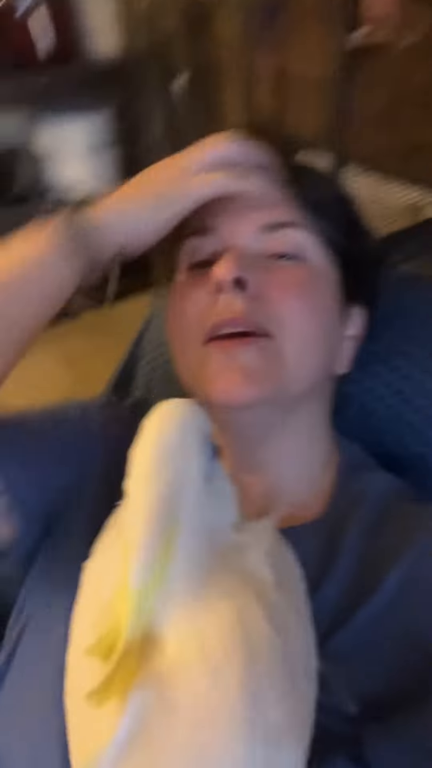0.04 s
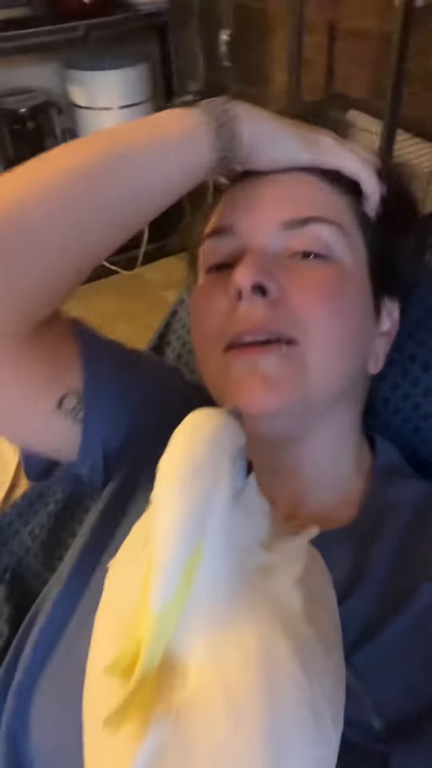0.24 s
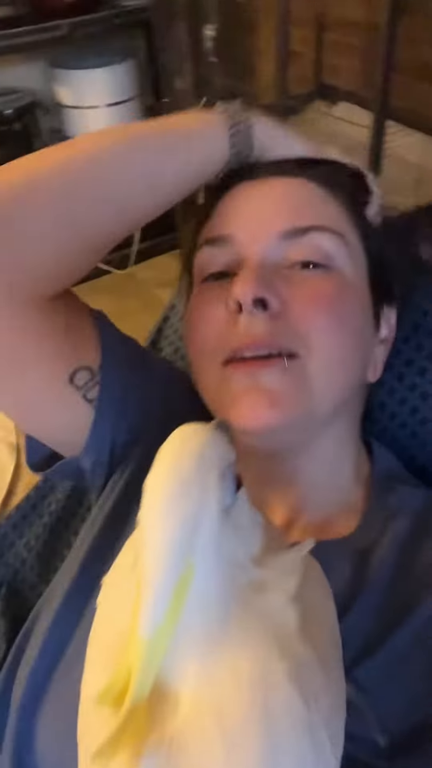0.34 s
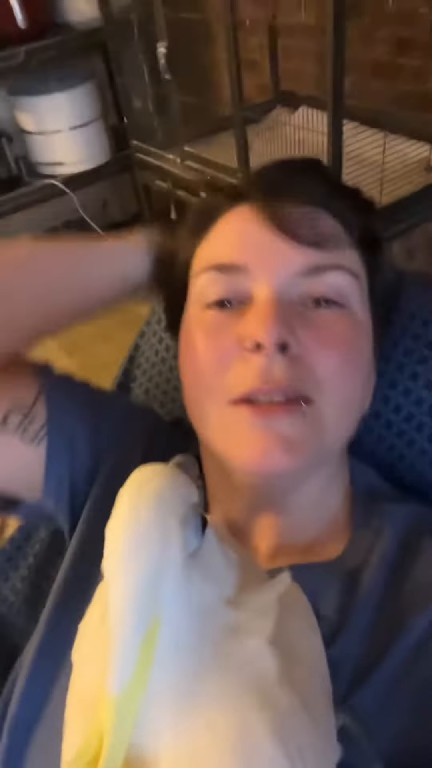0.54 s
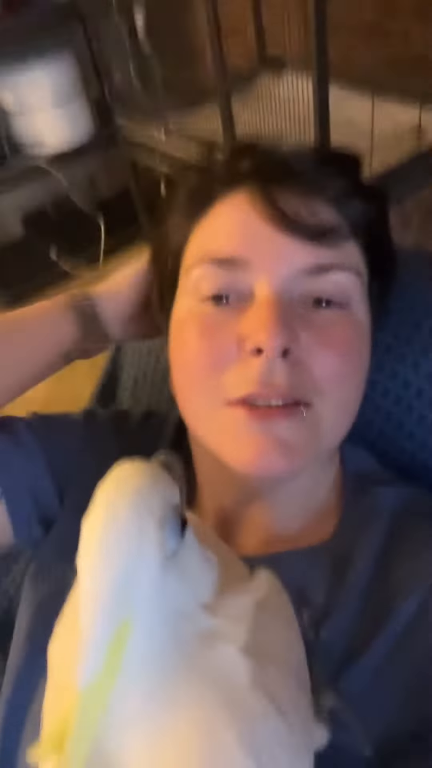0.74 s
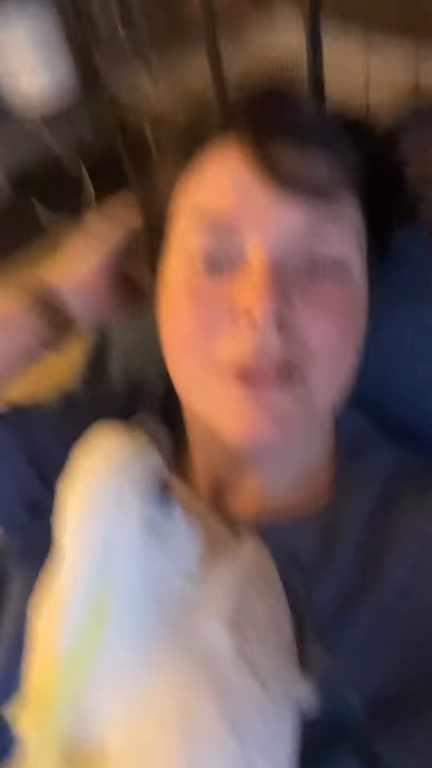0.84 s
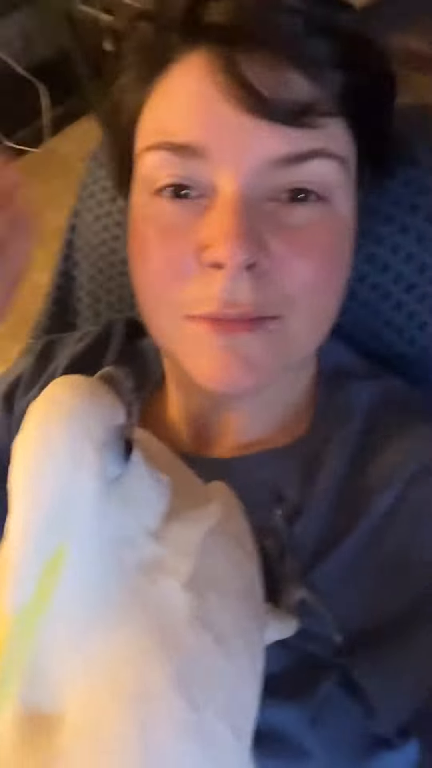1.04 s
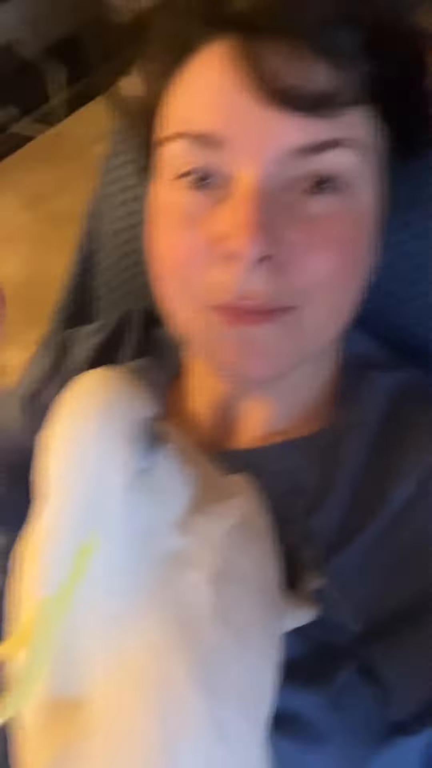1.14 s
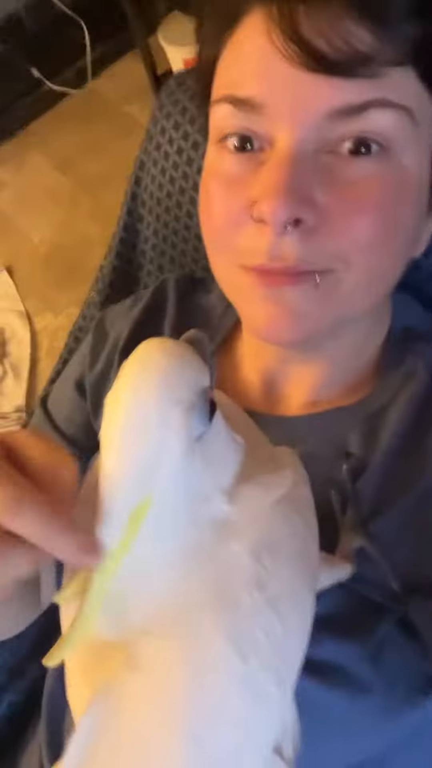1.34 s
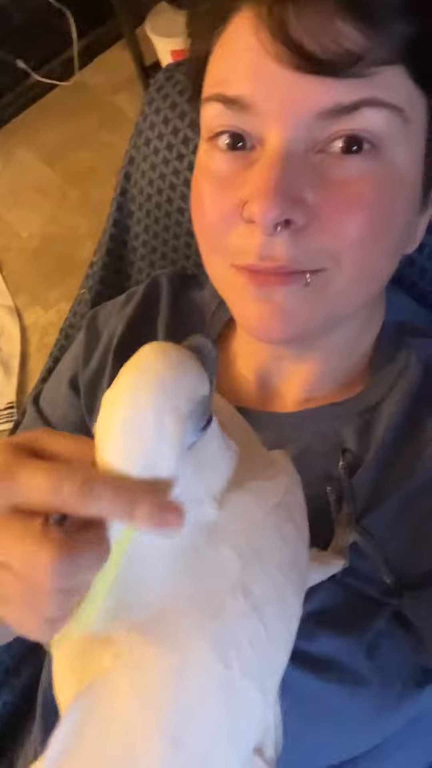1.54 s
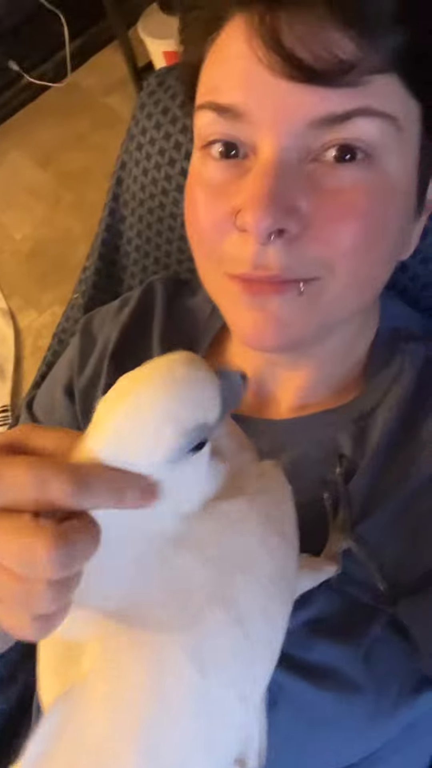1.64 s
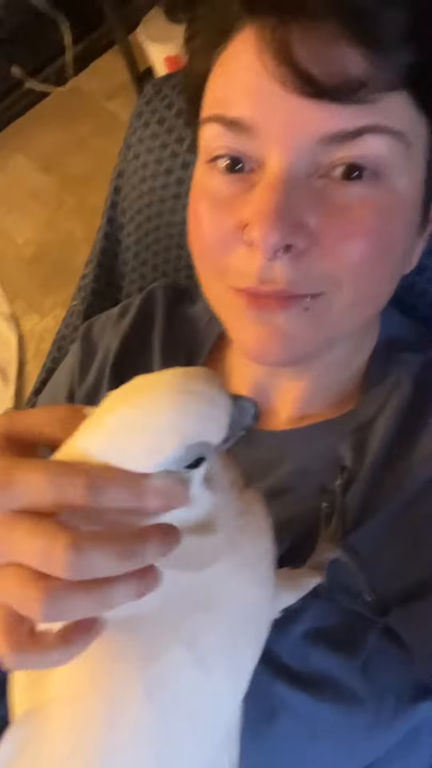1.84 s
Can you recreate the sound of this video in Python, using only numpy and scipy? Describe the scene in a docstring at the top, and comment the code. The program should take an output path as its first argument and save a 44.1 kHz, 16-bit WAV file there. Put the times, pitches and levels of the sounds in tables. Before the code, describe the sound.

A pet cockatoo calls close to the microphone in a lightly echoing living room. At 0.2 s comes a quick rising squeak, then from 0.33 s a louder hoarse, fluttering squeal climbs and thins into a faint whistle by 0.6 s. Soft peeps follow around 0.8-1.0 s, a shrill rattling rasp at 1.15 s, a dull bump with rebounds at 1.45 s, and faint gliding peeps until 1.9 s. A quiet fan hums and rushes throughout.

```python
"""In a living room, a pet cockatoo gives a rising squeak, a hoarse squeal that thins into a whistle, and a rasp.
Voiced calls are fluttering tones with overtones; the rasp is rattling noise under a shrill tone.
Soft peeps glide around the calls, and a dull bump with two rebounds rings low and scuffs.
The walls prolong all of these with fading noise; a fan adds wavering tones and a rush of air."""
import sys
import numpy as np
from scipy import signal
from scipy.fft import rfft, irfft
from scipy.io import wavfile

SR = 44100
rng = np.random.default_rng(int(sys.argv[2]) if len(sys.argv) > 2 else 0)


def wrap_up_sound(samples):
    """Save the sound to the file named by the first command line argument, as 16-bit audio."""
    columns = np.atleast_2d(samples).T
    # keep every value between -1 and 1, then stretch to whole-number steps
    tamed = np.clip(columns, -1, 1)
    steps = np.round(tamed * 32767).astype(np.int16)
    wavfile.write(sys.argv[1], SR, steps)


N = 83790  # length in samples

# All source levels below are before the room; those of voiced calls are also before the throat.
# Rising squeak: t/s, pitch f/Hz, level/dB
SQUEAK = [(.213, 1822, -51), (.226, 2027, -28.5), (.24, 2120, -26), (.258, 2220, -31), (.283, 2303, -41.5),
          (.305, 2317, -57), (.345, 2384, -36)]
# Hoarse squeal: t/s, pitch f/Hz, level/dB, roughness (0 = smooth, 1 = fully rough, slightly more allowed)
SQUEAL = [(.325, 1512, -33, 0.75), (.357, 1650, -30.5, 1.06), (.372, 1988, -24, 1.1),
          (.4, 2045, -22.5, 0.7), (.424, 2153, -24, 0.9), (.434, 2352, -24, 1.07),
          (.457, 2400, -28.5, 0.81), (.468, 2856, -27, 0.54), (.498, 2910, -45, 0.34),
          (.52, 2700, -35, 0.8)]
# Thin whistle: t/s, pitch f/Hz, level/dB
WHISTLE = [(.522, 3120, -36.5), (.533, 3347, -37.5), (.553, 3300, -45), (.573, 3460, -52), (.6, 3262, -53),
           (.645, 3150, -43.5), (.68, 3130, -69), (.715, 3250, -63), (.74, 3110, -71)]
# Overtones 2, 3, ... of each kind of voice: level/dB relative to the fundamental
SQUEAK_OVERTONES = [-4.5, -11.5, -18.5]
SQUEAL_OVERTONES = [-12, -28, -28.5]
THIN_OVERTONES = [-42]
# Colour that throat and beak give the voiced calls: f/Hz, level/dB
THROAT_COLOUR = [(1200, -25.5), (1800, -2.5), (2300, 0), (3450, 3), (3750, -5), (4200, 1.5), (5100, 4.5),
                 (5600, -10), (6200, -3.5), (7500, -4), (8600, -3), (10200, -9)]
# Rasping chirp: t/s, body level/dB, shrill top level/dB, centre of the top f/Hz
RASP = [(1.092, -60, -76, 5925), (1.118, -35.5, -71, 5940), (1.134, -43.5, -56, 6216),
        (1.148, -38, -32, 6200), (1.163, -32.5, -27.5, 6264), (1.18, -25.5, -28, 5756),
        (1.197, -32.5, -43, 5790), (1.214, -37, -60, 5500), (1.24, -60, -58, 5460), (1.26, -69, -72, 5600)]
# Throat resonances in the rasp: f/Hz, width f/Hz, relative level/dB
RASP_RESONANCES = [(2110, 670, -4.5), (2670, 610, -1.5), (3540, 920, -1), (4470, 1160, 0.5)]
# Soft peeps: start t/s, length t/s, first pitch f/Hz, last pitch f/Hz, level/dB
PEEPS = [(0.179, 0.025, 1808, 1950, -45.5), (0.774, 0.042, 2592, 2157, -50),
         (0.819, .016, 2870, 2810, -54.5), (0.892, 0.043, 2262, 2880, -47), (0.951, 0.071, 1514, 1560, -55),
         (1.414, 0.038, 3703, 2482, -50.5), (1.44, 0.0344, 2920, 2442, -46), (1.459, .03, 2322, 1948, -45),
         (1.55, 0.05, 2022, 2222, -49), (1.579, 0.0627, 2525, 2885, -52), (1.701, .025, 2166, 1960, -49),
         (1.734, 0.049, 1986, 2928, -52), (1.856, 0.045, 2020, 2416, -52)]
# Bump and its rebounds: t/s, level/dB
BUMPS = [(1.4453, -29), (1.455, -38), (1.483, -38.5)]
# Modes that ring after each contact: f/Hz, relative level/dB, time to fall 60 dB t/s
BUMP_MODES = [(137, -6.5, 0.064), (229, -4.5, 0.11), (269, -3, 0.052), (372, -3, 0.043),
              (444.3, -0.5, 0.074), (515, -1.5, 0.054), (626, -6, 0.031), (864, -0.5, 0.026)]
# Fan tones: f/Hz, level/dB
FAN_TONES = [(482, -55.5), (523, -66), (601, -65.5), (975, -66.5)]
# Colour of the steady air: f/Hz, relative level/dB
AIR_COLOUR = [(25, -31), (45, -16), (70, -4.5), (110, -8.5), (170, -9), (250, -7), (330, -7.5), (430, -2.5),
              (560, -5), (750, -10), (1000, -8.5), (1300, -11), (2200, -8.5), (3200, -18.5), (4500, -24.5),
              (7000, -30), (9800, -35.5), (11500, -44), (16000, -91)]
# Echo decay in the room: f/Hz, time to fall 60 dB t/s
ROOM_T60 = [(200, 0.37), (700, .33), (2200, .52), (3200, 0.48), (5000, 0.43), (9000, 0.39)]
# Stereo width of the echoes: f/Hz, side level/dB relative to the middle
ROOM_SIDE = [(200, -15), (600, -15), (1100, 0.5), (2000, -5), (3200, -1), (5000, -7), (9000, -0.5)]

SQUEAK_ROUGH, WHISTLE_ROUGH, PEEP_ROUGH = 0.38, 0.444, 0.72
# Flutter of a fully rough voice; depth is a fraction of the pitch
FLUTTER_HZ, FLUTTER_DEPTH, SHIMMER_DB = 247.2, 0.125, 1
EDGE_S = 0.0017  # fade at each end of a call
HISS_DB, HISS_HZ, HISS_WIDTH_HZ = -12.5, 5790, 1000
TOP_WIDTH_HZ, RATTLE_HZ, RATTLE_DB = 657, 302, 1.7
BEAK_HZ, BEAK_WIDTH_HZ, BEAK_DB = 7100, 2650, -5
SCUFF_DB, SCUFF_HZ, SCUFF_WIDTH_HZ, SCUFF_T60_S = -3, 1140, 2100, 0.035
BUMP_LOW_HZ = 85
TONE_WAVER_DB, TONE_LEVEL_HZ = 1, 10.4
TONE_DRIFT, TONE_DRIFT_HZ = 0.00399, 7.5  # drift is a fraction of the pitch
AIR_DB, AIR_WIDE_HZ, AIR_SIDE = -50.5, 1100, 0.6
CALL_WET_DB, CALL_DIRECT_DB = -2.5, -5.5
PEEP_WET_DB, PEEP_DIRECT_DB = 1.5, 0
BUMP_WET_DB, BUMP_DIRECT_DB = -3, -2.5
FIRST_ECHO_S = 0.0024
TREBLE_HZ, TOP_HZ = 10190, 16000


def syrinx(pitch_hz, rough, overtones_db):
    """The bird's vibrating membrane: a tone with overtones, whose pitch and strength flutter when rough."""
    flutter = rough * FLUTTER_DEPTH * np.tanh(walk(FLUTTER_HZ))
    phase = turn(pitch_hz * (1 + flutter))
    tone = np.sin(phase)
    for number, db in enumerate(overtones_db, start=2):
        tone = tone + undb(db) * np.sin(number * phase)
    shimmer = unit(undb(rough * SHIMMER_DB * walk(FLUTTER_HZ)))
    return np.sqrt(2) * tone * shimmer


def call(rows, rough, overtones_db):
    """A voiced call coloured by the throat; rougher voices let more air hiss through the beak."""
    pitch_hz, level_db = curves(rows)[:2]
    hiss = undb(HISS_DB) * rough ** 2 * band(HISS_HZ, HISS_WIDTH_HZ)
    voice = syrinx(pitch_hz, rough, overtones_db) + hiss
    shaped = voice * undb(level_db) * gate(rows[0][0], rows[-1][0])
    throat = undb(on_log(np.maximum(frequencies(), 1), THROAT_COLOUR))
    return irfft(rfft(shaped) * throat, N)


def rasp():
    """Noise rings the throat under a shrill, unsteady tone, and a rattle shakes the strength of both."""
    body_db, top_db, top_hz = curves(RASP)
    body = unit(sum(undb(db) * band(hz, width) for hz, width, db in RASP_RESONANCES))
    phase = turn(top_hz + TOP_WIDTH_HZ / 2 * walk(FLUTTER_HZ))
    beak = undb(BEAK_DB) * band(BEAK_HZ, BEAK_WIDTH_HZ)
    top = unit(np.sqrt(2) * np.sin(phase) + beak)
    rattle = unit(undb(RATTLE_DB * walk(RATTLE_HZ)))
    return (undb(body_db) * body + undb(top_db) * top) * rattle * gate(RASP[0][0], RASP[-1][0])


def peeps():
    """Short, soft voice glides that swell and fade."""
    out = 0
    for start, length, first_hz, last_hz, db in PEEPS:
        progress = np.clip((times() - start) / length, 0, 1)
        swell = np.sqrt(np.abs(np.sin(np.pi * progress)))
        pitch_hz = first_hz + (last_hz - first_hz) * progress
        out = out + undb(db) * swell * syrinx(pitch_hz, PEEP_ROUGH, THIN_OVERTONES)
    return out


def bump():
    """A dull knock: each contact rings low modes that die away, with a brief noisy scuff."""
    out = 0
    for start, db in BUMPS:
        age = np.maximum(times() - start, 0)
        ring = 0
        for k, (hz, mode_db, t60) in enumerate(BUMP_MODES):
            sign = (-1) ** k  # neighbouring modes start in opposite directions
            ring = ring + sign * undb(mode_db) * np.sin(2 * np.pi * hz * age) * decay(age, t60)
        scuff = undb(SCUFF_DB) * band(SCUFF_HZ, SCUFF_WIDTH_HZ) * decay(age, SCUFF_T60_S) * (age > 0)
        out = out + undb(db) * (ring + scuff)
    return highpass(out, BUMP_LOW_HZ, order=2)


def room(x, wet_db, direct_db):
    """Direct sound plus echoes made of fading noise; each frequency band has its own decay and width."""
    t, f = times(), frequencies()
    edges = [0, 350, 700, 1400, 2600, 3800, 6500, SR / 2]  # Hz
    spectra = rfft(rng.standard_normal((2, N)))
    tail = 0
    for low, high in zip(edges, edges[1:]):
        centre = (low + high) / 2
        fade = decay(t, on_log(centre, ROOM_T60)) * (t > FIRST_ECHO_S)
        in_band = (f >= low) & (f < high)
        mid, side = irfft(spectra * in_band, N) * fade / np.sqrt(np.sum(fade ** 2))
        tail = tail + stereo(mid, side * undb(on_log(centre, ROOM_SIDE)))
    echoes = signal.fftconvolve(x[None], tail, axes=1)[:, :N]
    return undb(direct_db) * x + undb(wet_db) * echoes


def fan():
    """Steady tones waver in pitch and level over a rush of noise that is wider in the treble."""
    def colour(f):
        return undb(on_log(f, AIR_COLOUR))

    spread = AIR_SIDE * np.minimum(frequencies() / AIR_WIDE_HZ + 0.08, 1)
    air = stereo(noise(colour), irfft(rfft(noise(colour)) * spread, N))
    hum = 0
    for hz, db in FAN_TONES:
        level = undb(db + TONE_WAVER_DB * walk(TONE_LEVEL_HZ))
        phase = turn(hz * (1 + TONE_DRIFT * walk(TONE_DRIFT_HZ)))
        hum = hum + level * np.sqrt(2) * np.sin(phase)
    return undb(AIR_DB) * air + hum


def undb(db):
    """Turn decibels into gain."""
    return 10 ** (np.asarray(db) / 20)


def unit(x):
    """Scale to an rms (average strength) of one."""
    return x / np.sqrt(np.mean(x ** 2))


def times():
    """The time of each sample, in seconds."""
    return np.arange(N) / SR


def frequencies():
    """The frequency of each spectrum step, in Hz."""
    return np.fft.rfftfreq(N, 1 / SR)


def turn(hz):
    """Add up a changing frequency into the phase of a wave."""
    return 2 * np.pi * np.cumsum(hz) / SR


def decay(age, t60):
    """Die away by 60 dB in t60 seconds."""
    return np.exp(-np.log(1000) * age / t60)


def curves(rows):
    """Join each column of a table by straight lines in time."""
    at, *columns = np.array(rows, float).T
    return [np.interp(times(), at, column) for column in columns]


def gate(start, end):
    """Open from start to end, with short fades."""
    return np.clip(np.minimum(times() - start, end - times()) / EDGE_S, 0, 1)


def noise(shape):
    """Noise whose gain is a function of frequency, with an rms of one."""
    gain = shape(frequencies() + 1e-3)  # the offset avoids zero frequency
    return unit(irfft(rfft(rng.standard_normal(N)) * gain, N))


def walk(hz):
    """Random wandering, mostly slower than a few times hz."""
    return noise(lambda f: np.exp(-(f / hz) ** 2 / 2))


def band(hz, width_hz):
    """Noise around one resonance; the width is taken where the gain is half its peak."""
    return noise(lambda f: 1 / (1 + ((f / hz - hz / f) * hz / width_hz) ** 2))


def on_log(f, rows):
    """Read a table of frequency and value on a logarithmic frequency axis."""
    hz, value = np.array(rows, float).T
    return np.interp(np.log(f), np.log(hz), value)


def stereo(mid, side):
    """Make left and right from middle and side."""
    return np.array([mid + side, mid - side])


def highpass(x, hz, order):
    """Weaken what lies below hz."""
    return signal.sosfilt(signal.butter(order, hz, "high", fs=SR, output="sos"), x)


def scene():
    """The bird and the bump in the room, over the fan."""
    squeak = call(SQUEAK, SQUEAK_ROUGH, SQUEAK_OVERTONES)
    squeal = call(SQUEAL, curves(SQUEAL)[2], SQUEAL_OVERTONES)
    whistle = call(WHISTLE, WHISTLE_ROUGH, THIN_OVERTONES)
    calls = room(squeak + squeal + whistle + rasp(), CALL_WET_DB, CALL_DIRECT_DB)
    soft_peeps = room(peeps(), PEEP_WET_DB, PEEP_DIRECT_DB)
    knock = room(bump(), BUMP_WET_DB, BUMP_DIRECT_DB)
    return calls + soft_peeps + knock + fan()


def record(dry):
    """Dull the high treble, then cut the very top steeply."""
    dull = signal.sosfilt(signal.butter(8, TREBLE_HZ, fs=SR, output="sos"), dry)
    # 0.2 dB ripple below the cut, 70 dB weaker beyond it
    return signal.sosfilt(signal.ellip(8, 0.2, 70, TOP_HZ, fs=SR, output="sos"), dull)


dry = scene()
out = record(dry)
wrap_up_sound(out)
```